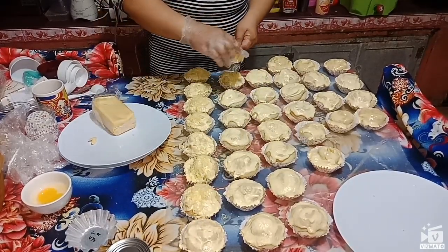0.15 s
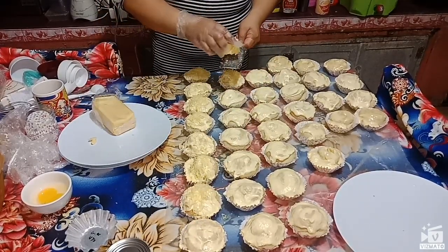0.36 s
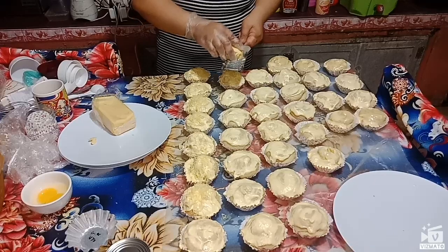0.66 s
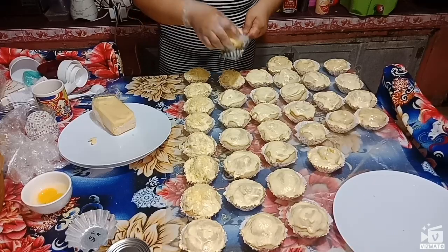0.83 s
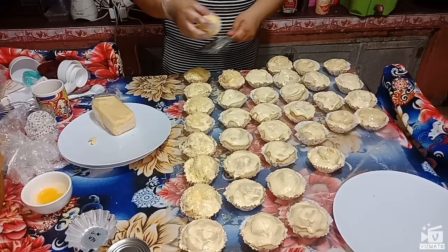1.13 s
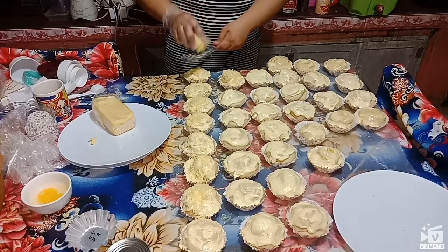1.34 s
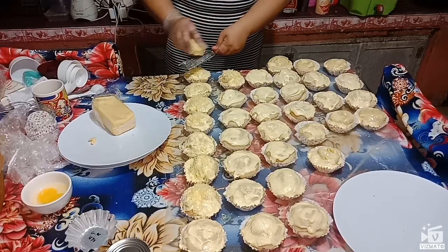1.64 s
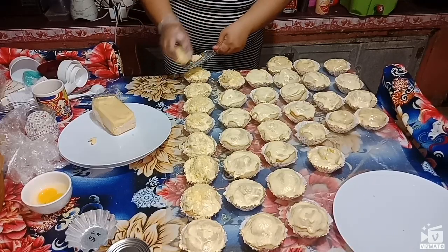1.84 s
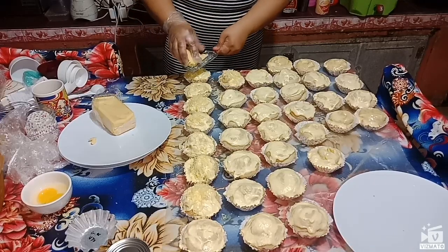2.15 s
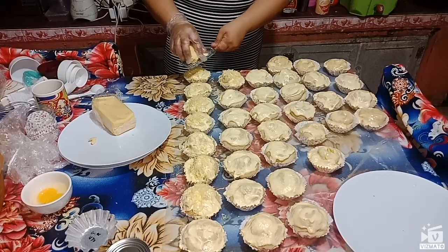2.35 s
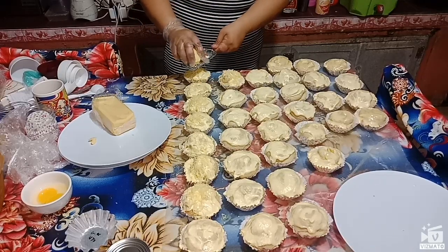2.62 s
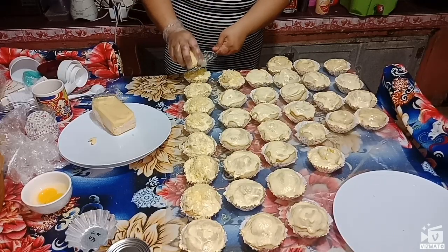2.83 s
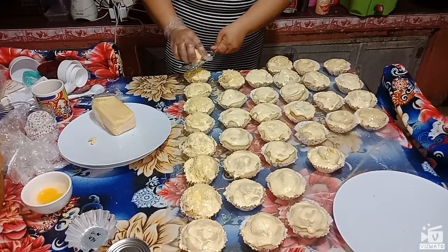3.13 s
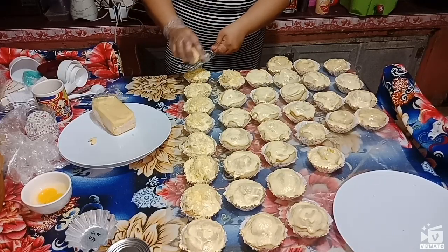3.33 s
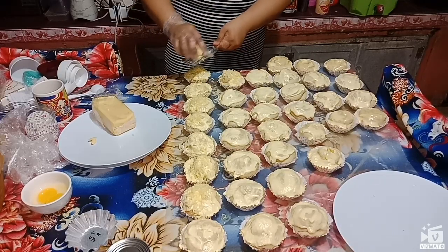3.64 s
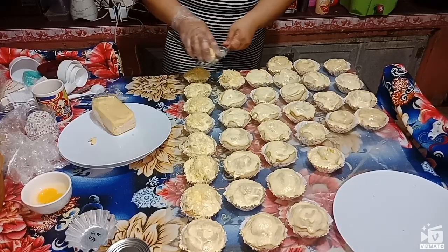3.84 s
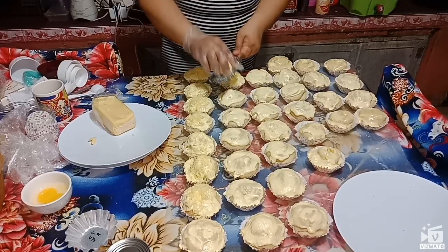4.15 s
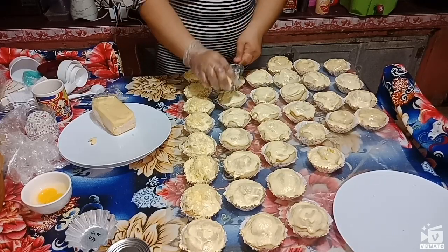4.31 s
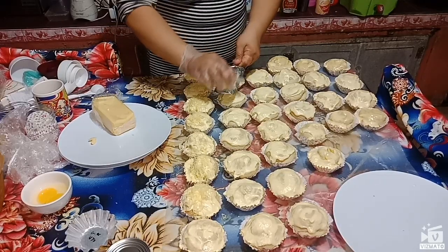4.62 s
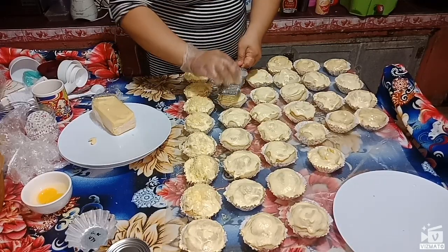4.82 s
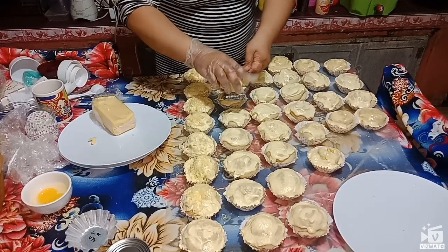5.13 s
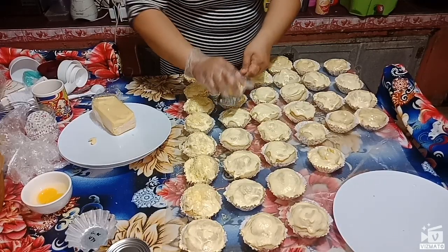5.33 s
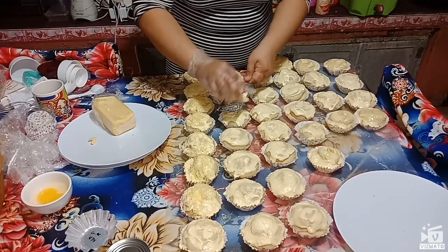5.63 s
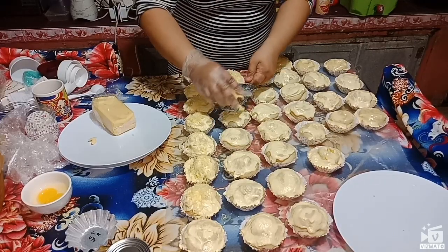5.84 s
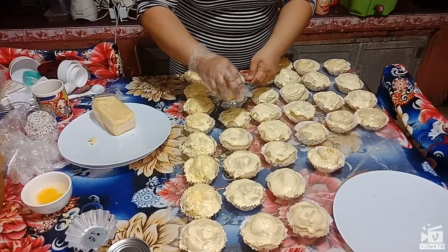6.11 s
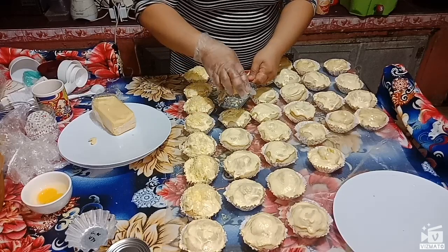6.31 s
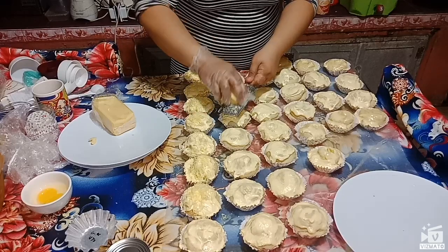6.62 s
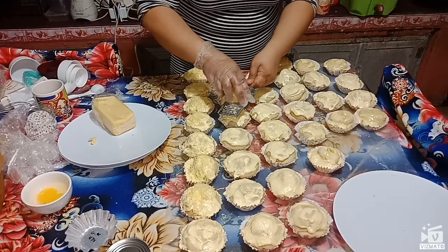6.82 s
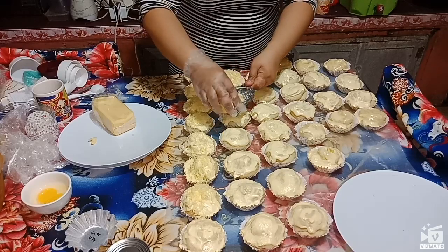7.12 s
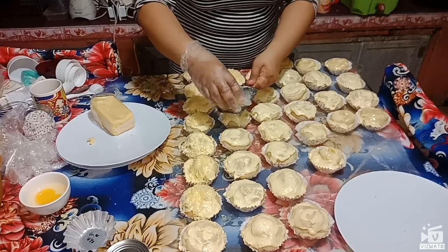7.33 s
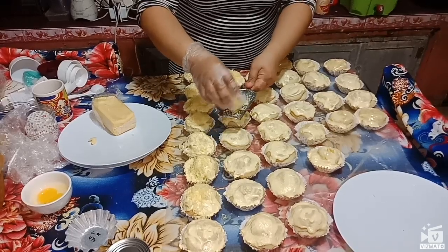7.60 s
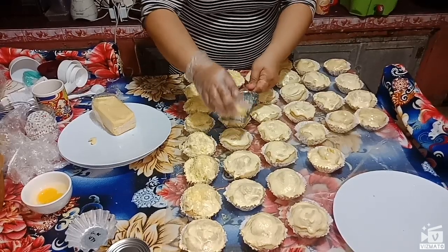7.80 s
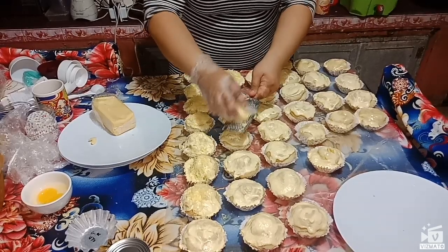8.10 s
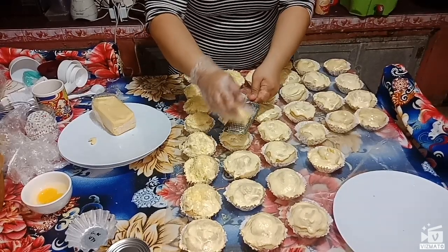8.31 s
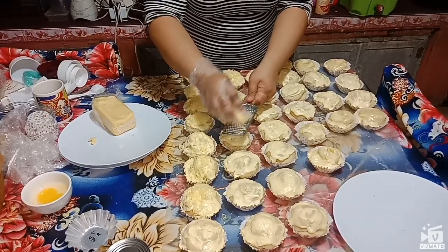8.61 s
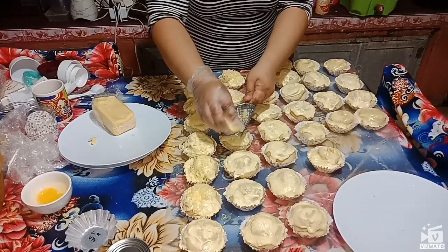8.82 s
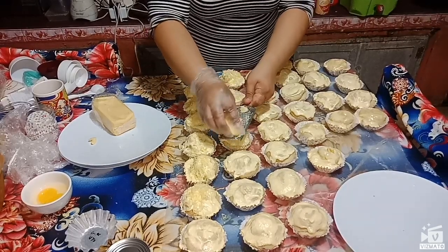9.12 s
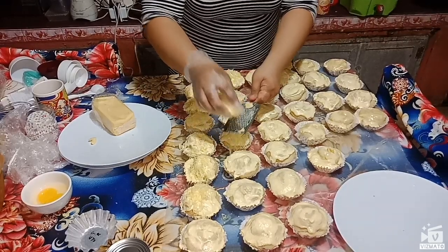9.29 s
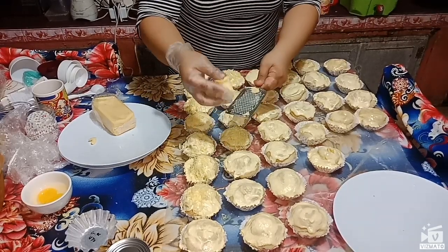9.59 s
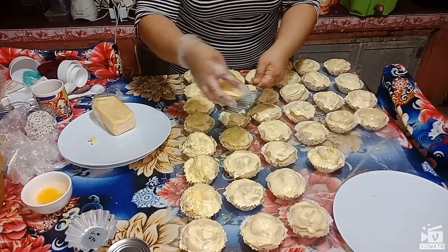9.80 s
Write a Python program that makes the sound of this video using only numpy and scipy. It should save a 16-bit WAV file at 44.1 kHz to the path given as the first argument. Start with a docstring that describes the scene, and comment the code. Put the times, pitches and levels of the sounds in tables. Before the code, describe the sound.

In a reverberant home kitchen, a hand rubs cheese over a thin metal grater. Faint scrapes begin, a few grow firmer, and hollow thumps crowd the table. A short squawk slips out midway, harder strokes follow, then a burst of loud ringing scrapes and finally a strong knock. Low rumble and quiet room air lie beneath; the stereo microphone hears mostly wall reflections.

```python
"""Cheese is grated by hand in a hard-walled kitchen; thin metal pans and moulds scrape, rattle and knock.
Faint strokes open it, louder ones come near 1.5 s; the table thumps throughout, crowding from 4.4 s, and a
short squawk comes at 5.2 s. Hard strokes follow near 6 s, ringing ones at 7.7-8 s, a strong knock at 9.5 s.
Metal, pans and table are noise contacts shaped by spectra, with ringing modes or a low note; a rumble swells
with the handling. The sound comes mostly off the walls, so the two microphone ports agree only in the bass."""
import sys
import numpy as np
from scipy import signal
from scipy.fft import rfft, irfft
from scipy.io import wavfile

SR = 44100
rng = np.random.default_rng(int(sys.argv[2]) if len(sys.argv) > 2 else 0)


def master(y):
    """Save y as 16-bit WAV."""
    cut = np.clip(np.atleast_2d(y).T, -1, 1)
    pcm = np.round(cut * 32767)  # scale
    wavfile.write(sys.argv[1], SR, pcm.astype(np.int16))


N = 438794
STEP = 40         # samples between values of a slow control
LEAD_S = 0.0058   # bursts start this long before their listed time


def amp(db):
    """Decibels to gain."""
    return 10 ** (np.asarray(db) / 20)


def rms_one(x):
    """Scale to rms 1."""
    return x / np.sqrt(np.mean(x ** 2) + 1e-20)


def at_hz(points):
    """A table read at every bin of the spectrum, on a log-frequency axis."""
    hz, value = np.transpose(points)
    bins_hz = np.arange(N // 2 + 1) * SR / N
    return np.interp(np.log(bins_hz + 1), np.log(hz), value)


def coloured(x, spectrum):
    """Shape white sound to a spectrum; rms 1."""
    return rms_one(irfft(rfft(x) * amp(at_hz(spectrum)), N))


def drift(rate_hz):
    """Slow chance of spread 1 at every control step: noise through a double one-pole low-pass."""
    r = np.exp(-2 * np.pi * STEP * rate_hz / SR)
    noise = rng.standard_normal(N // STEP + 2001)
    return rms_one(signal.lfilter([1], [1, -2 * r, r * r], noise)[2000:])


def held(slow):
    """Hold each control step's value for every sample."""
    return np.repeat(slow, STEP)[:N]


def contacts(per_s, spread_db):
    """Random tiny contacts of uneven size, as two unrelated sets of reflections; rms 1."""
    sizes = amp(spread_db * np.minimum(rng.exponential(1, (2, N)), 4))
    sizes = sizes * rng.choice([-1, 1], (2, N))
    return rms_one(sizes * (rng.random((2, N)) < per_s / SR) + 1e-9)


def bursts(starts, levels_db, rise, hold, fall):
    """Each burst rises, holds and dies with the room (by 60 dB in fall seconds); their powers add."""
    power, t = np.full(N, 1e-12), np.arange(SR) / SR
    for s, level_db, up, stay in np.broadcast(starts, levels_db, np.maximum(rise, 0.002), hold):
        at = max(round((s - LEAD_S) * SR), 0)
        dying_s = np.maximum(t - up - stay, 0)
        shape = np.minimum(t / up, 1) * amp(level_db - 60 * dying_s / fall)
        power[at:at + SR] += shape[:N - at] ** 2
    return np.sqrt(power)


# a tone is favoured not at all by a faint stroke, fully by a firm one; the favour fades after the stroke
FAVOUR_S, FAINT_DB, FIRM_DB = 0.082, -81, -49.5
FIRM_RING_DB = 5.5   # a firm stroke rings this much more than a faint one


def ringing(force, modes, tone_hz, cycles, uneven_db, favour_db, tilt_db):
    """Force drives modes that die by 60 dB in so many cycles; grip and each stroke's favoured tone vary."""
    s, db, _, _, rise, hold = np.transpose(STROKES)[:6]
    t = np.arange(N // STEP + 1) * STEP / SR
    last = np.maximum(np.searchsorted(s - LEAD_S, t) - 1, 0)   # the latest stroke at each moment
    firm = np.clip((db - FAINT_DB) / (FIRM_DB - FAINT_DB), 0, 1)
    since_end_s = np.maximum(t - (s + rise + hold)[last], 0)
    fading = firm[last] * np.exp(-since_end_s / FAVOUR_S)
    tilt = np.interp(t, np.arange(N) / SR, tilt_db)
    out = 0
    for hz, level_db in modes:
        r = amp(-60 * hz / (cycles * SR))
        favoured = np.exp(-(np.log(hz / tone_hz) / 0.074) ** 2)[last] * fading
        high = np.clip(np.log2(hz / 1680.0), 0, 1.3)   # a brighter stroke lifts the upper modes
        grip_db = level_db + uneven_db * drift(8.3) + favour_db * favoured
        grip_db = grip_db + FIRM_RING_DB * firm[last] + high * tilt
        push = force * held(amp(grip_db) * np.sqrt(1 - r))
        out = out + signal.lfilter([1, 0, -1], [1, -2 * r * np.cos(2 * np.pi * hz / SR), r * r], push)
    return out / np.sqrt(np.sum(amp(np.array(modes)[:, 1]) ** 2))


# spectrum of the room air: (frequency [Hz], relative level [dB per Hz])
AIR_SPECTRUM = [(45, -43.5), (120, -7.5), (273, -3.5), (1130, -12), (3890, -17.5), (9140, -33),
                (14400, -27), (15500, -51)]
AIR_DB = -70.5


def room_air():
    """The air of the kitchen: steady shaped noise, unrelated in the two sound fields."""
    return coloured(rng.standard_normal((2, N)), AIR_SPECTRUM) * amp(AIR_DB)


# spectrum of the low rumble: (frequency [Hz], relative level [dB per Hz])
RUMBLE_SPECTRUM = [(15, -63), (25, -30.5), (40, -38.5), (53, -22), (64, -6.5), (71, 3.5), (82, -2.5),
                   (216, -3.5), (340, -10.5), (570, -120)]
TABLE_REST_DB = -92.5   # floor of the table's drive, so the rumble never stops


def low_rumble(top):
    """Low shaped noise that swells with the table's drive, but less steeply."""
    swell = np.hypot(top, amp(TABLE_REST_DB)) ** 0.28
    return coloured(rng.standard_normal((2, N)), RUMBLE_SPECTRUM) * amp(-44.0) * swell


# hollow thumps on the table: (time [s], relative level [dB])
TABLE_THUMPS = [(0, -64), (0.231, -62.5), (0.592, -60.5), (1.019, -64.5), (1.535, -43.5), (1.611, -44),
                (1.997, -63), (2.14, -54.5), (2.356, -48), (2.601, -62), (3.07, -55.5), (3.271, -58.5),
                (3.426, -62.5), (4.386, -54.5), (4.612, -47), (4.682, -43.5), (4.821, -40), (5.013, -48.5),
                (5.14, -40.5), (5.285, -42), (5.474, -50.5), (5.587, -44), (5.812, -49.5), (5.932, -48),
                (6.011, -41.0), (6.574, -53), (6.721, -56.5), (6.868, -49.5), (7.011, -48.5),
                (7.151, -52.5), (7.33, -62), (8.352, -54), (8.538, -54.5), (8.758, -64), (8.84, -57),
                (8.945, -57), (9.006, -48.5), (9.485, -32.5)]
THUMP_RISE_S, THUMP_FALL_S, TABLE_FOLLOWS_PANS_DB = 0.067, 0.24, -9


def table_drive(pans):
    """The thumps, and a share of what shakes the pans, drive the table top."""
    thumps = bursts(*np.transpose(TABLE_THUMPS), THUMP_RISE_S, 0, THUMP_FALL_S)
    return np.hypot(thumps, amp(TABLE_FOLLOWS_PANS_DB) * pans)


# spectrum of the hollow table top: (frequency [Hz], relative level [dB per Hz])
HOLLOW_SPECTRUM = [(50, -67), (120, -19), (200, -10.5), (237, -5.5), (318, 0.5), (351, -7), (420, -6.5),
                   (550, -53.5), (920, -120)]


def table(level):
    """The table top answers the hands with lumpy hollow thumps around one round, wavering note."""
    note_hz = 310.0 * (1 + 0.08 * drift(8.0))
    note = np.sqrt(2) * np.sin(2 * np.pi * np.cumsum(held(note_hz)) / SR)
    lumps = coloured(contacts(per_s=400, spread_db=2.5), HOLLOW_SPECTRUM)
    # the note is weaker in the second sound field
    return (amp(-2.5) * lumps + amp(-4.0) * note * [[1], [0.3]]) * level


# spectrum of the pans' thud: (frequency [Hz], relative level [dB per Hz])
PAN_SPECTRUM = [(80, -64), (250, -31), (420, 0), (1010, -4.5), (1560, -32.5), (2640, -120)]
# ringing modes of the pans: (frequency [Hz], relative level [dB])
PAN_MODES = [(474, -52.5), (528, -55.5), (587, -54), (635, -49.5), (706, -53), (790, -55.5), (872, -55.5),
             (980, -58), (1028, -53.5)]


def pans_and_moulds(level):
    """Sparser soft contacts through the pans: a thud and the ring of their modes."""
    force = contacts(per_s=1500, spread_db=1.5)
    thud = coloured(force, PAN_SPECTRUM) * level * held(amp(0.48 * drift(8.3)))
    ring = ringing(force * level, PAN_MODES, np.array(STROKES)[:, 3], cycles=120.0,
                   uneven_db=2.0, favour_db=9.5, tilt_db=np.zeros(N))
    return amp(-7) * thud + amp(-14.5) * ring


SQUAWK_S, SQUAWK_LASTS_S, SQUAWK_SLIPS_PER_S = 5.196, 0.068, 170
# resonances of the squawk: (frequency [Hz], level [dB], time to die by 60 dB [s])
SQUAWK_RESONANCES = [(500, -38, 0.033), (1660, -39, 0.032), (2070, -44.5, 0.027)]


def squawk():
    """A short stick-slip: uneven slips, strongest midway, into three resonances."""
    count = round(SQUAWK_LASTS_S * SQUAWK_SLIPS_PER_S)
    way = (np.arange(count) + rng.uniform(0, 0.597, (2, count))) / count   # 0 to 1 through the squawk
    slips, out = np.full((2, SR // 4), 1e-18), np.zeros((2, N))
    slip_at = (way * SQUAWK_LASTS_S * SR).astype(int)
    slips[np.arange(2)[:, None], slip_at] = np.sin(np.pi * (0.1 + 0.8 * way))
    at = round(SQUAWK_S * SR)
    for hz, level_db, t60 in SQUAWK_RESONANCES:
        r, w = amp(-60 / (t60 * SR)), 2 * np.pi * hz / SR
        gain = amp(level_db) * np.sin(w)
        out[:, at:at + SR // 4] += signal.lfilter([0, gain], [1, -2 * r * np.cos(w), r * r], slips)
    return out


# single clear tones that ring out of a stroke:
# (time [s], frequency [Hz], level before the beat [dB], hold [s], time to die by 60 dB [s])
CLEAR_TONES = [(2.153, 2760, -58, 0.002, 0.04), (2.591, 3951, -57, 0.07, 0.16),
               (7.745, 2217, -26.5, 0.02, 0.33), (7.748, 525.7, -37, 0.021, 0.63),
               (7.832, 1931, -24, 0.06, 0.18), (8.028, 1566, -42, 0.03, 0.54),
               (8.08, 849, -52.5, 0.036, 0.65), (9.495, 701, -20.5, 0.027, 0.03),
               (9.507, 1693, -26, 0.081, 0.36)]


def clear_tones():
    """Each tone swells fast, holds with a slow beat and dies; its phase differs between the two sound fields."""
    out, t = np.zeros((2, N + SR)), np.arange(SR // 2) / SR
    turns = 2 * np.pi * rng.random((len(CLEAR_TONES), 3))
    for (s, hz, level_db, hold, t60), turn in zip(CLEAR_TONES, turns):
        beat_db = 3.4 * np.sin(2 * np.pi * 35.0 * t + turn[2])
        dying_db = 60 * np.maximum(t - hold, 0) / t60
        shape = np.minimum(t / 0.0036, 1) * amp(level_db - dying_db + beat_db)
        at = round(s * SR)
        out[:, at:at + len(t)] += shape * np.sin(2 * np.pi * hz * t + turn[:2, None])
    return out[:, :N]


# spectrum of the broad rasp: (frequency [Hz], relative level [dB per Hz])
RASP_SPECTRUM = [(150, -80), (590, -68.5), (1000, -10.5), (1340, -12.5), (1510, -8.5), (1820, -4.5),
                 (2500, -5.5), (2760, -3.5), (4000, -12.5), (5200, -36), (8800, -120)]
# spectrum of the rasp's treble: (frequency [Hz], relative level [dB per Hz])
TREBLE_SPECTRUM = [(500, -72.5), (2350, -31), (4000, -5.5), (5080, -6.5), (7010, -5.5), (10400, -28),
                   (15500, -26.5)]
# ringing modes of the metal sheet: (frequency [Hz], relative level [dB])
SHEET_MODES = [(1244, -46.5), (1340, -46), (1523, -55.5), (1561, -46), (1685, -39.5), (1933, -44),
               (1986, -54), (2105, -40), (2234, -41.5), (2293, -47), (2379, -54.5), (2616, -48),
               (2686, -43), (2810, -52), (3214, -37), (3311, -48), (3779, -39), (3951, -40), (4452, -43),
               (4549, -41), (4980, -40), (5120, -46), (5593, -41), (6035, -42.5)]


def metal(level, treble_db):
    """Dense scraping contacts: a broad rasp, its treble, and the ring of the sheet."""
    force = contacts(per_s=4000, spread_db=1.5)
    bite = held(amp(2.83 * drift(45) - 5.0))   # the teeth bite unevenly
    rasp = coloured(force, RASP_SPECTRUM) * bite
    edge = coloured(force, TREBLE_SPECTRUM) * held(amp(1.2 * drift(30) - 4.5)) * amp(treble_db)
    ring = ringing(force * level, SHEET_MODES, np.array(STROKES)[:, 2], cycles=320.0,
                   uneven_db=3.5, favour_db=9.5, tilt_db=0.59 * (treble_db + 1))
    return (rasp + edge) * level + amp(-12.0) * ring


# scraping strokes: (time [s], metal level [dB], metal tone that rings most [Hz], pan tone that rings most [Hz],
#                    rise [s], hold [s], treble relative to the metal [dB], pans relative to the metal [dB])
# metal and pan levels drive their layers; a rise is at least 2 ms
STROKES = [(0, -52, 2090, 635, 0.0015, 0.12, -3.5, -9), (0.23, -63, 3951, 635, 0.008, 0.051, -2.5, -1.5),
           (0.486, -62, 3951, 635, 0.02, 0.11, -3, -2.5), (0.622, -60, 3951, 872, 0.013, 0.12, -18, -4),
           (0.918, -53, 1750, 635, 0.074, 0.1, 1, -6.5), (1.258, -68, 4549, 455, 0.06, 0.096, -11, -2.5),
           (1.464, -53.5, 3214, 587, 0.0097, 0.036, -2.5, -4.5),
           (1.517, -42, 4160, 640, 0.0096, 0.079, -0.5, -9),
           (1.568, -43.5, 1244, 635, 0.04, 0.051, -3, -11.5),
           (1.721, -53, 4660, 635, 0.046, 0.0073, -5.5, -3),
           (2.005, -69.5, 3750, 580, 0.036, 0.012, -15, 4),
           (2.155, -62.5, 3930, 635, 0.004, 0.088, -14, -1.5),
           (2.222, -45.5, 2200, 706, 0.0032, 0.037, -14, -25),
           (2.292, -52, 2105, 790, 0.041, 0.031, -10, -7.5),
           (2.376, -41.5, 3180, 630, 0.0069, 0.0084, -0.5, -9),
           (2.536, -65, 4470, 587, 0.071, 0.034, 8, 2.5), (2.599, -53.5, 3951, 706, 0.0036, 0.039, 0.5, -1),
           (2.843, -58.5, 2120, 790, 0.017, 0.02, -11, -12),
           (2.994, -55.5, 4070, 470, 0.076, 0.15, -7, -5.5),
           (3.216, -61.5, 1523, 1028, 0.018, 0.073, -8, -3),
           (3.421, -65.5, 3270, 470, 0.0059, 0.1, -12.5, -1), (3.54, -71, 4549, 587, 0.037, 0.1, -13, -21),
           (3.784, -53.5, 3970, 575, 0.0095, 0.043, -21, -13),
           (4.008, -65, 4452, 573.5, 0.0077, 0.012, -9, -8),
           (4.305, -57, 1685, 1060, 0.029, 0.022, -7.5, -3.5),
           (4.386, -51, 4120, 635, 0.029, 0.11, -4, -11.5),
           (4.519, -48, 1760, 635, 0.026, 0.052, -4.5, -2.5),
           (4.631, -48, 4000, 583, 0.03, 0.093, -3.5, -4), (4.769, -48, 3214, 980, 0.047, 0.02, 6.5, -5),
           (4.847, -56, 1685, 630, 0.0098, 0.14, -4.5, 1), (4.992, -56, 3311, 625, 0.062, 0.013, 4, 1),
           (5.08, -53, 4000, 635, 0.007, 0.042, 4, 2), (5.187, -51.5, 1690, 500, 0.028, 0.062, -4, 2.5),
           (5.262, -57, 3070, 474, 0.005, 0.089, -1.5, 3),
           (5.448, -56.5, 3340, 474, 0.076, 0.0048, -2.5, -3.5),
           (5.578, -59, 3930, 635, 0.064, 0.037, -13.5, 8), (5.76, -48, 1244, 593, 0.14, 0.045, 2.5, -2),
           (5.873, -42, 3060, 990, 0.052, 0.057, 1, -18), (5.951, -44.5, 3500, 940, 0.0067, 0.11, -9, 6),
           (6.031, -32.5, 3070, 1040, 0.033, 0.043, -8.5, -3),
           (6.113, -33.5, 2800, 1030, 0.034, 0.023, -3.5, -15),
           (6.345, -54, 2616, 710, 0.0024, 0.021, -12, 0.5),
           (6.591, -54, 3670, 960, 0.005, 0.043, -26, -1.5),
           (6.614, -63.5, 2810, 980, 0.006, 0.115, -10, -11),
           (6.748, -52.5, 4000, 635, 0.03, 0.021, -19, -15),
           (6.847, -58, 3270, 640, 0.058, 0.041, -9, -3.5), (6.998, -61, 3311, 635, 0.068, 0.017, -11, 2.5),
           (7.167, -52, 3140, 528, 0.011, 0.13, -7.5, -14),
           (7.35, -53.5, 2290, 635, 0.015, 0.22, -13.5, -11),
           (7.532, -50, 1685, 1020, 0.0044, 0.1, -4, -4.5),
           (7.653, -42, 2616, 1000, 0.016, 0.039, -12.5, -7.5),
           (7.738, -26.5, 1540, 525, 0.0087, 0.048, -9, -8),
           (7.823, -21, 1940, 1040, 0.014, 0.046, -6, -13),
           (7.923, -21.5, 2850, 790, 0.0073, 0.026, -4, -11),
           (7.956, -24.5, 4040, 872, 0.05, 0.02, -9, -12), (8.085, -52, 1570, 872, 0.011, 0.14, -16, -7),
           (8.29, -53, 3300, 666, 0.027, 0.1, -4, -2.5), (8.416, -64.5, 2686, 587, 0.028, 0.17, 2, 7),
           (8.5, -44.5, 3350, 474, 0.024, 0.02, -11, -26),
           (8.69, -55.5, 2616, 1028, 0.032, 0.12, -12.5, -8.5),
           (8.886, -63.5, 3180, 470, 0.041, 0.14, -6.5, 4.5), (9.187, -62.5, 1630, 710, 0.05, 0, -4.5, 3),
           (9.398, -38, 5320, 703, 0.023, 0.13, -1.5, -5.0),
           (9.494, -24.5, 2046, 474, 0.015, 0.14, -6, -9.5), (9.764, -56.5, 3860, 528, 0.27, 0.29, 2, 6),
           (9.904, -41.5, 3214, 1020, 0.051, 0.033, -3.5, -4.5)]
# sharp knocks, some alone and some on top of a stroke: (time [s], metal level [dB], pans level [dB])
KNOCKS = [(0.074, -48.5, -65), (0.646, -49, -75), (3.047, -89, -46.5), (6.046, -55, -28),
          (7.179, -44.5, -44.5), (7.531, -42, -45.5), (8.18, -53, -89), (1.585, -70, -46.5),
          (9.5, -39, -18)]
METAL_FALL_S, TREBLE_FALL_S, PANS_FALL_S = 0.33, 0.3, 0.33             # strokes, to die by 60 dB
KNOCK_RISE_S, SHEET_KNOCK_FALL_S, PANS_KNOCK_FALL_S = 0.004, 0.25, 0.43


def handling():
    """Hand strokes and knocks as the drive of the sheet, its brightness in dB and the drive of the pans."""
    s, metal_db, _, _, rise, hold, treble_db, pans_db = np.transpose(STROKES)
    knocked, knock_db, knock_pans_db = np.transpose(KNOCKS)
    scraped = bursts(s, metal_db, rise, hold, METAL_FALL_S)
    treble = bursts(s, metal_db + treble_db, rise, hold, TREBLE_FALL_S)
    brightness_db = 20 * np.log10(treble / scraped)
    sheet = np.hypot(scraped, bursts(knocked, knock_db, KNOCK_RISE_S, 0, SHEET_KNOCK_FALL_S))
    pans = np.hypot(bursts(s, metal_db + pans_db, rise, hold, PANS_FALL_S),
                    bursts(knocked, knock_pans_db, KNOCK_RISE_S, 0, PANS_KNOCK_FALL_S))
    return sheet, brightness_db, pans


# how alike the two microphone ports are: (frequency [Hz], left-right likeness [-1 to 1])
PORT_LIKENESS = [(60, 0.96), (150, 0.92), (380, 0.73), (950, -0.081), (2380, 0.055), (15000, -0.26)]
# balance of the ports: (frequency [Hz], left minus right [dB])
PORT_LEAN = [(60, 0), (950, 0), (3770, -2.0), (15000, -1)]


def ports(pair):
    """Two unrelated sound fields become left and right, alike in the bass only."""
    alike = np.clip(at_hz(PORT_LIKENESS), -0.99, 0.99)
    mid, side = rfft(pair) * np.sqrt([1 + alike, 1 - alike])
    lean = amp(at_hz(PORT_LEAN) / 2)
    return irfft(np.array([(mid + side) * lean, (mid - side) / lean]), N)


def scene():
    """Strokes, knocks and thumps drive metal, pans and table over rumble and room air."""
    sheet, brightness_db, pans = handling()
    top = table_drive(pans)
    background = room_air() + low_rumble(top)
    handled = table(amp(-2.0) * top) + pans_and_moulds(pans) + metal(sheet, brightness_db)
    return ports(background + handled + squawk() + clear_tones())


CUTOFF_HZ = 15550


def record(dry):
    """A steep elliptic low-pass cuts the top."""
    return signal.sosfilt(signal.ellip(10, 0.5, 70, CUTOFF_HZ, fs=SR, output="sos"), dry)


dry = scene()
out = record(dry)
master(out)
```